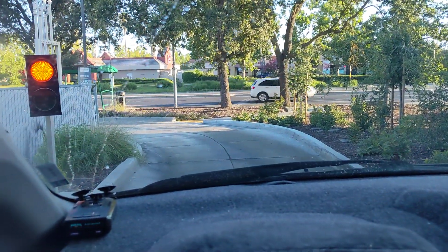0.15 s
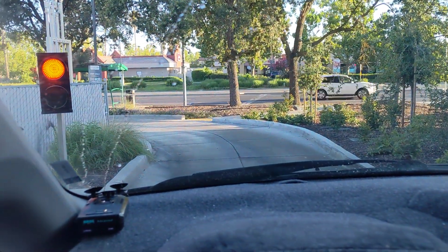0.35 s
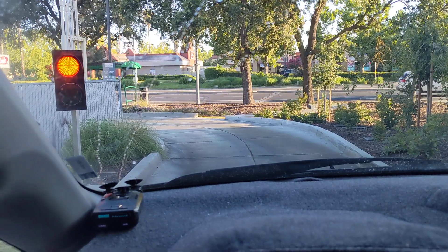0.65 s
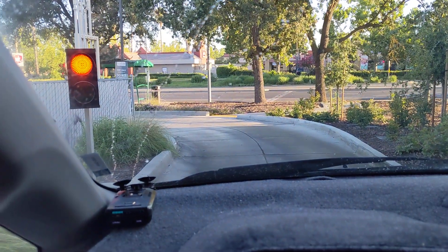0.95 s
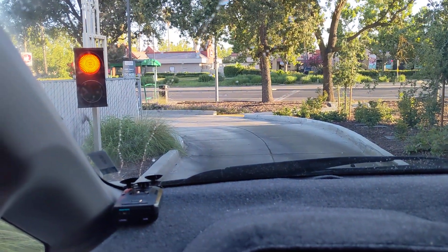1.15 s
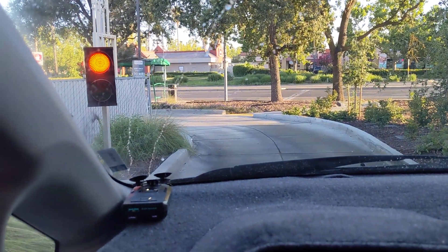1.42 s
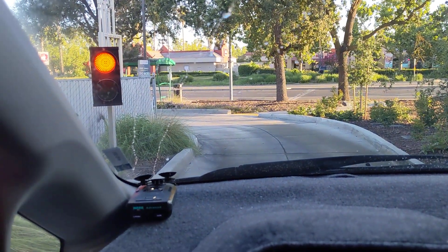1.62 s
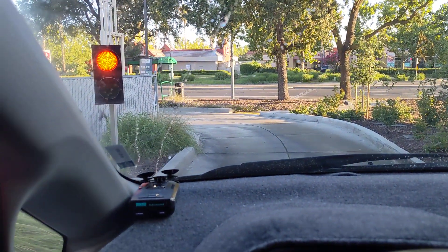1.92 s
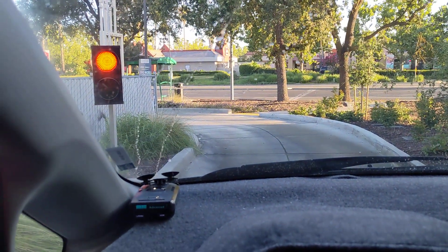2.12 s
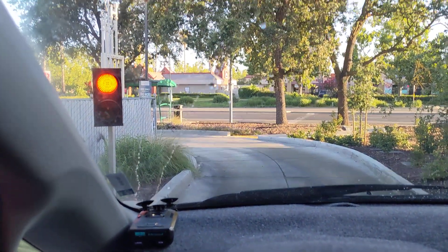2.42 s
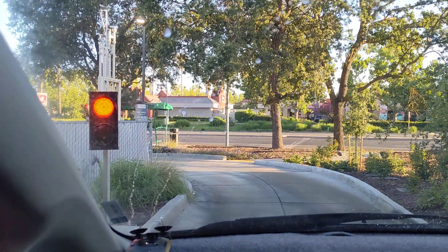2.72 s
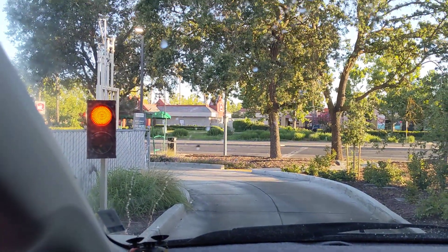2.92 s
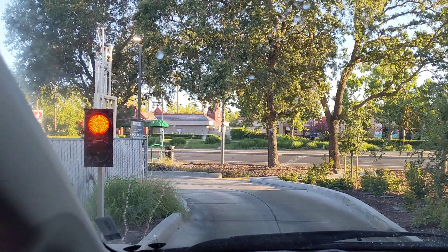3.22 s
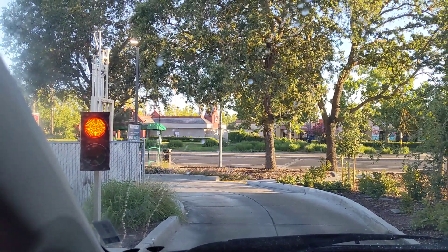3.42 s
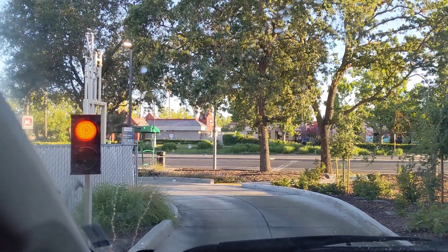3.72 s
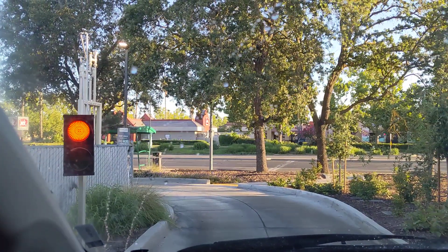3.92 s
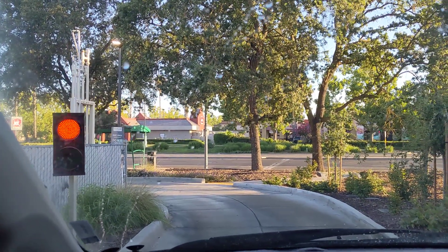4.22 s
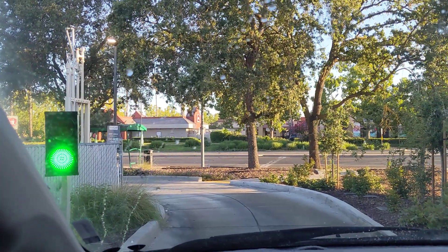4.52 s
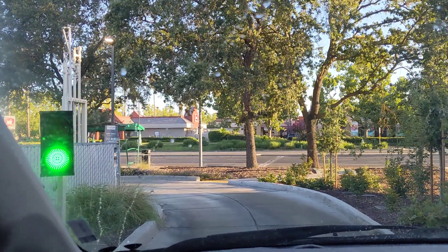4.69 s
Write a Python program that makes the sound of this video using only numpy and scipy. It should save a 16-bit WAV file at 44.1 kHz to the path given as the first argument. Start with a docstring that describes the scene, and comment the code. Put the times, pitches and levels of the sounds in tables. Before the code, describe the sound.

Inside a car creeping out of an automatic car wash, the dryers make a deep, continuous roar of air, its treble dulled by the windows. A light hiss, a faint pulsing fan tone and occasional soft water swishes sit within it. The low boom swells in gusts, a seal whistles very faintly for a moment, and air thumps the body panels near the end as the rumble grows a little heavier.

```python
"""Car wash, inside a car creeping out beneath the drying blowers.
Air jets buffet the body and make the cabin boom in gusts. Their rush comes through the glass, which
cuts the treble, and eases as the jets pass behind the windscreen. Two fans beat slowly in the roar,
water swishes over the glass, and air whistles briefly at a seal."""
import sys
import numpy as np
from scipy import signal
from scipy.fft import rfft, irfft, next_fast_len
from scipy.io import wavfile
from scipy.ndimage import uniform_filter1d, minimum_filter1d, map_coordinates

SR = 44100
rng = np.random.default_rng(int(sys.argv[2]) if len(sys.argv) > 2 else 0)


def waveform_to_disk(signal):
    """Save audio, clipped to [-1, 1], as 16-bit WAV at the path in sys.argv[1]."""
    frames = np.transpose(np.atleast_2d(signal))
    scaled = np.clip(frames, -1, 1) * 32767
    samples = np.round(scaled).astype(np.int16)
    wavfile.write(sys.argv[1], SR, samples)


N = 214061

# noise spectra: f/Hz, density/dB
BUFFET_SPECTRUM = [(10, -31), (23, -32), (32, -24.5), (41, -8), (49, -0.5), (58, 2), (72, -4.5), (80, 0.5),
                   (92, -21.5), (140, -91)]
BOOM_SPECTRUM = [(55, -39.5), (80, -5.5), (110, -0.5), (150, 0), (185, -5.5), (220, -12), (260, -37),
                 (400, -100)]
RUSH_SPECTRUM = [(130, -32), (220, -2.5), (275, 0.5), (308, -3), (362, 0), (405, -5), (464, -2.5),
                 (545, -10), (591, -8.5), (666, -13), (883, -14), (988, -19.5), (1160, -18), (1400, -24),
                 (1500, -33), (1950, -60), (3300, -120)]
HISS_SPECTRUM = [(880, -34), (1500, -5.5), (1550, -3.5), (1700, -0.5), (2090, -5), (2310, -3), (2600, -7.5),
                 (3300, -7), (3590, -10.5), (4420, -14.5), (4850, -16.5), (6510, -20.5), (7080, -18),
                 (7710, -23.5), (9500, -27.5), (12400, -62.5), (20900, -120)]
SPRAY_SPECTRUM = [(6500, -36.5), (9500, -4), (10700, -0.5), (12500, 1), (14100, 2), (15700, 0)]
SWISH_SPECTRUM = [(1200, -40), (2400, -5.5), (2950, 2.5), (4000, -14), (6000, -21), (8100, -15),
                  (10000, -27), (15000, -25.5)]
# cabin air and glass resonances: f/Hz, width/Hz, lift/dB
CABIN_MODES = [(128.5, 6.5, 5), (245.2, 9.3, 3.5), (281, 20, 2), (467, 25, 3), (903, 90, 2), (1418, 89, 5),
               (2310, 130, 2), (2840, 60, 4), (3130, 62, 2), (3330, 120, 1.5), (4360, 130, 3),
               (7200, 140, 1.5)]
# left-right likeness: f/Hz, correlation
EAR_CORRELATION = [(60, 1), (92, 0.97), (140, 1), (210, 0.92), (330, 0.81), (500, 0.45), (770, 0.53),
                   (1170, 0.01), (1790, -0.18), (2740, 0.16), (4190, -0.08), (6410, 0.01), (9810, -0.03),
                   (15000, -0.03)]
# left minus right: f/Hz, level/dB
EAR_BALANCE = [(60, 2), (130, 1.1), (230, 4.5), (380, 1.5), (470, 5.5), (580, 1), (700, -5), (1000, 5),
               (1350, 2), (2050, 6), (2500, 1.5), (3000, 2), (4500, 1.6), (14000, 2)]
# air through a seal: start/s, length/s, level/dB
SEAL_PUFFS = [(2.722, 0.044, -56), (2.782, .022, -57.5), (2.846, .04, -59), (2.907, .028, -62),
              (2.96, .025, -63)]
# water over the glass: t/s, half length/s, level/dB, lift above 10 kHz/dB
WATER_SWISHES = [(0.277, .05, -48.5, 2), (1.132, .06, -58.5, 15), (3.93, .035, -56.5, 17),
                 (4.79, .035, -60, 16)]
# fan tones: harmonic, level/dB, left lead/rad
BLADE_HARMONICS = [(1, -40.5, .2), (2, -50.5, 1.9)]
# droning resonance: t/s, half length/s, f/Hz, width/Hz, level/dB
DRONE_MODE = (3, 0.38, 201.5, 21, -21)
# air thumps on the panels: t/s, half length/s, lift/dB
PANEL_THUMPS = [(3.2, .15, 3), (3.917, 0.055, 8.5), (4.398, .04, 3)]
# gusts in the boom: start/s, length/s, lift/dB
BOOM_GUSTS = [(0.128, .48, 3), (1.975, 0.21, 4.5), (2.66, 1.08, 2.5), (3.952, 0.083, 5)]


def amp(db):
    """Decibels to gain."""
    return 10 ** (np.asarray(db) / 20)


def rms(x):
    """Root mean square."""
    return np.sqrt(np.mean(x ** 2) + 1e-20)


def log_interp(points, hz):
    """(f/Hz, value) points joined on a log axis."""
    point_hz, values = np.transpose(points)
    return np.interp(np.log(hz + 1), np.log(point_hz + 1), values)


def ramp(start_s, length_s):
    """Linear rise from 0 to 1, then held."""
    return np.clip((np.arange(N) / SR - start_s) / length_s, 0, 1)


def swell(at_s, half_s):
    """Gaussian envelope, peak 1."""
    return np.exp(-((np.arange(N) / SR - at_s) / half_s) ** 2)


def wobble(rate_hz):
    """Smooth curve through random knots."""
    knots = rng.standard_normal(int(N * rate_hz / SR) + 4)
    return map_coordinates(knots, [np.arange(N) * rate_hz / SR])


def filtered(x, response):
    """FFT filter with gain response(hz)."""
    size = next_fast_len(N + SR // 2)
    return irfft(rfft(x, size) * response(np.fft.rfftfreq(size, 1 / SR)), size)[..., :N]


def steadied(x, window_s):
    """Noise with its slow swells evened out."""
    power = uniform_filter1d(x.mean(axis=0) ** 2, size=int(window_s * SR))
    return x / np.sqrt(np.abs(power) + 1e-6)


def cabin_db(hz):
    """Summed lift of the cabin resonances."""
    return sum(db / (1 + (2 * (hz - mode_hz) / width_hz) ** 2) for mode_hz, width_hz, db in CABIN_MODES)


def turbulence(spectrum, eddy_db):
    """Stereo air noise in the cabin, mid rms 1; eddies lift random time-frequency patches."""
    def mid_side_gain(hz):
        # long waves reach both ears alike, short ones differ
        correlation = np.clip(log_interp(EAR_CORRELATION, hz), -.6, .999)
        side_gain = np.tan(np.arccos(correlation) / 2)
        return amp(log_interp(spectrum, hz) + cabin_db(hz)) * np.array([np.ones_like(hz), side_gain])

    bins = signal.stft(rng.standard_normal((2, N)), nperseg=512)[2]
    eddies = uniform_filter1d(rng.standard_normal(bins.shape[1:]), size=5, axis=0)
    eddies = uniform_filter1d(eddies, size=14, axis=1)
    noise = signal.istft(bins * amp(eddy_db * eddies / rms(eddies)), nperseg=512)[1][:, :N]
    mid, side = filtered(noise, mid_side_gain)
    ears = np.array([mid + side, mid - side])
    ears = filtered(ears, lambda hz: amp(np.outer([.5, -.5], log_interp(EAR_BALANCE, hz))))
    return ears / rms(ears.mean(axis=0))


def seal_whistle(centre_hz=7260, waver_hz=50, flutter_db=3.0, attack_s=.011, release_s=.018):
    """Thin, fluttering edge tone, in puffs as a jet hits a seal."""
    leak = sum(amp(db) * (ramp(start_s - attack_s / 2, attack_s) - ramp(start_s + length_s, release_s))
               for start_s, length_s, db in SEAL_PUFFS)
    phase = 2 * np.pi * np.cumsum(centre_hz + waver_hz * wobble(400)) / SR
    tone = amp(flutter_db * wobble(70)) * np.sin(phase)
    return leak * amp([[1.8], [-1.8]]) * tone / rms(tone)


def water_swishes():
    """Water swept across the glass; fine drops add sizzle."""
    out = np.zeros((2, N))
    for at_s, half_s, db, sizzle_db in WATER_SWISHES:
        spectrum = [(hz, level_db + sizzle_db * (hz > 10000)) for hz, level_db in SWISH_SPECTRUM]
        out += amp(db) * swell(at_s, half_s) * turbulence(spectrum, eddy_db=1.0)
    return out


def fans(blade_hz=585, beat_hz=1.46, second_db=-9, in_step_s=2.0):
    """Blade tones of two fans at nearly one speed beat, and waver in the moving air."""
    def fan(phase):
        ears = np.array([[.5], [-.5]])
        return sum(np.sqrt(2) * amp(db + 1.8 * wobble(7)) * np.sin(harmonic * phase + lead_rad * ears)
                   for harmonic, db, lead_rad in BLADE_HARMONICS)

    blade_phase = 2 * np.pi * np.cumsum(blade_hz + 1.55 * wobble(3.01) + 3.43 * wobble(25)) / SR
    beat_phase = 2 * np.pi * beat_hz * (np.arange(N) / SR - in_step_s)
    return fan(blade_phase) + amp(second_db) * fan(blade_phase + beat_phase)


def cabin_drone():
    """One narrow resonance swells as the jets cross the roof."""
    at_s, half_s, hz, width_hz, db = DRONE_MODE
    band = [(hz - 2 * width_hz, -60), (hz - width_hz / 2, 0), (hz + width_hz / 2, 0),
            (hz + 2 * width_hz, -60), (4 * hz, -140)]
    return amp(db) * swell(at_s, half_s) * steadied(turbulence(band, eddy_db=-.5), window_s=.18)


def air_stream(behind, rush_db=-22, hiss_db=-43.5, spray_db=-63.5):
    """Air rushes over the glass with a sizzle of blown spray; the spray eases last."""
    rush = amp(rush_db - 1.9 * behind) * turbulence(RUSH_SPECTRUM, eddy_db=.18)
    hiss = amp(hiss_db - 2.6 * behind + .19 * wobble(15)) * turbulence(HISS_SPECTRUM, eddy_db=1.0)
    spray_gain = amp(spray_db - 3.5 * behind ** 1.8 + .35 * wobble(14))
    return rush + hiss + spray_gain * turbulence(SPRAY_SPECTRUM, eddy_db=1.5)


def panel_buffet(behind, base_db=-23.5):
    """Jets shove and thump the panels, harder from behind."""
    thump_db = sum(db * swell(at_s, half_s) for at_s, half_s, db in PANEL_THUMPS)
    gain = amp(base_db + 3 * behind + thump_db + .7 * wobble(10))
    return gain * steadied(turbulence(BUFFET_SPECTRUM, eddy_db=1.5), window_s=.16)


def cabin_boom(behind, base_db=-16, edge_s=.06):
    """Jets set the cabin air booming; gusts swell it."""
    gust_db = sum(db * (ramp(start_s - edge_s / 2, edge_s) - ramp(start_s + length_s - edge_s / 2, edge_s))
                  for start_s, length_s, db in BOOM_GUSTS)
    gain = amp(base_db + .2 * behind + gust_db)
    return gain * steadied(turbulence(BOOM_SPECTRUM, eddy_db=1.35), window_s=.1)


def scene():
    """Stereo mix at the driver's seat."""
    behind = ramp(start_s=3.36, length_s=1.2)  # jets: 0 on the windscreen, 1 behind it
    rumble = panel_buffet(behind) + cabin_boom(behind) + cabin_drone()
    return rumble + air_stream(behind) + fans() + water_swishes() + seal_whistle()


def record(dry, ceiling=.97, cutoff_hz=15800):
    """Peak limiter, then brick-wall low-pass."""
    needed_gain = np.minimum(1, ceiling / (np.abs(dry).max(axis=0) + 1e-9))
    gain = uniform_filter1d(minimum_filter1d(needed_gain, size=901), size=901)
    return filtered(dry * gain, lambda hz: hz < cutoff_hz)


dry = scene()
out = record(dry)
waveform_to_disk(out)
```